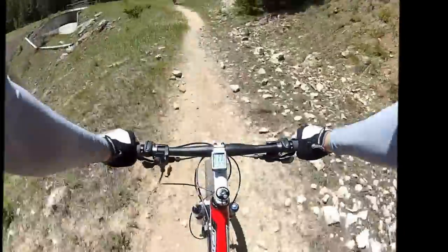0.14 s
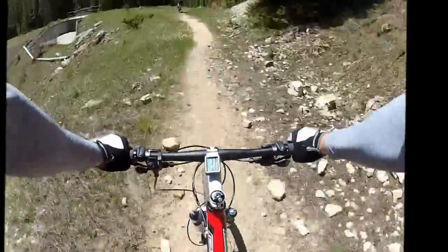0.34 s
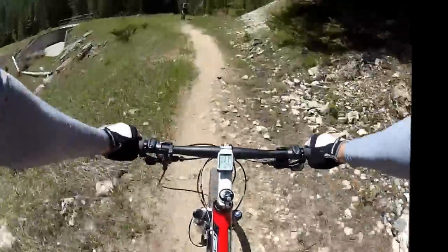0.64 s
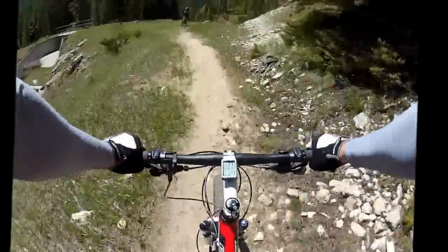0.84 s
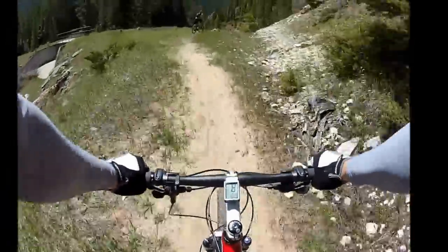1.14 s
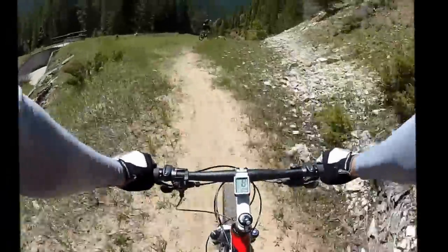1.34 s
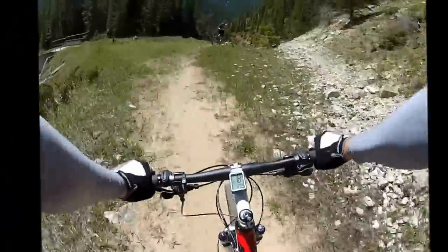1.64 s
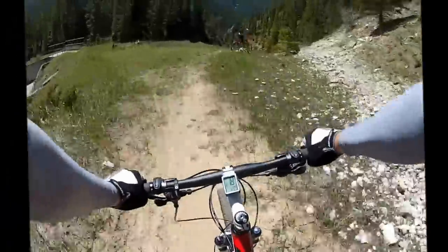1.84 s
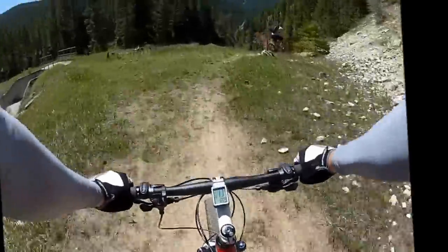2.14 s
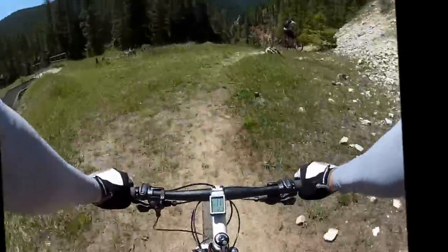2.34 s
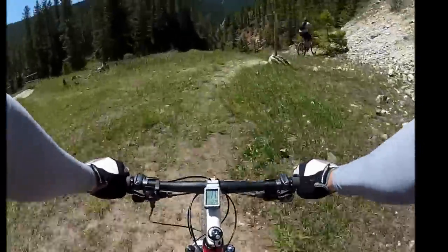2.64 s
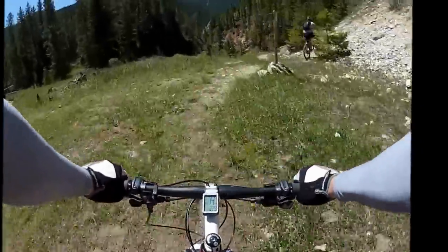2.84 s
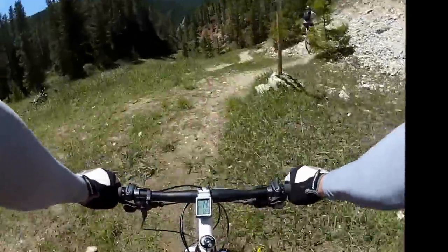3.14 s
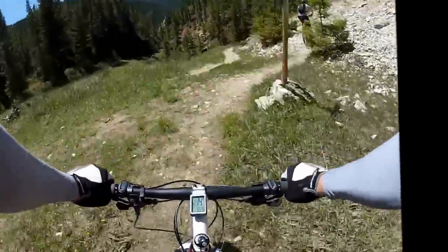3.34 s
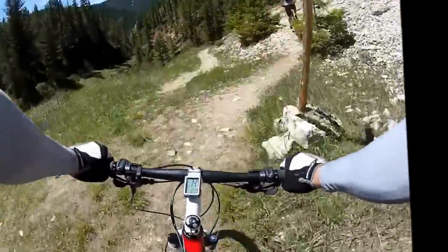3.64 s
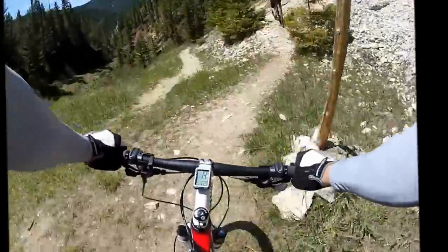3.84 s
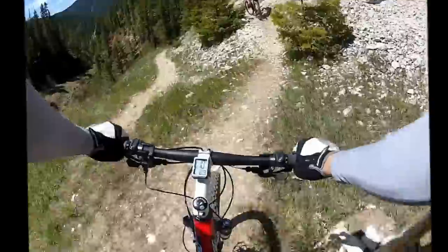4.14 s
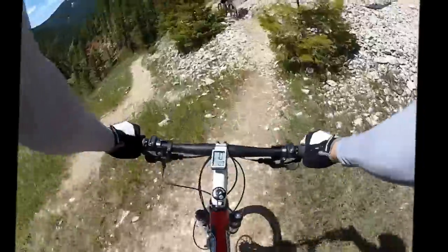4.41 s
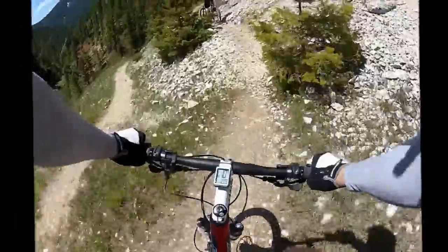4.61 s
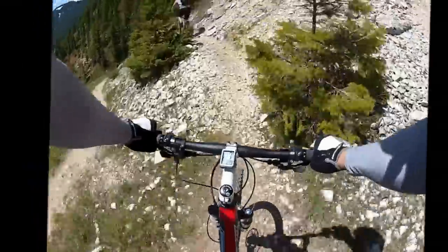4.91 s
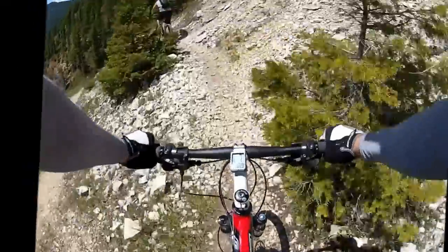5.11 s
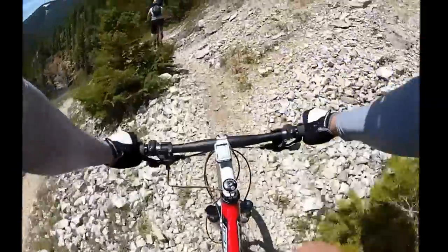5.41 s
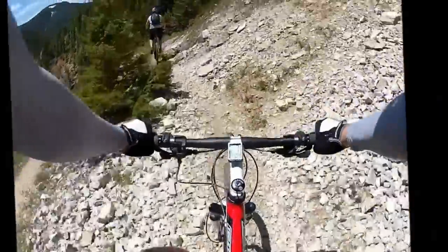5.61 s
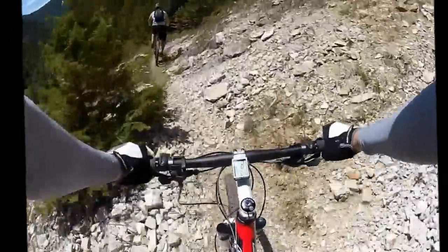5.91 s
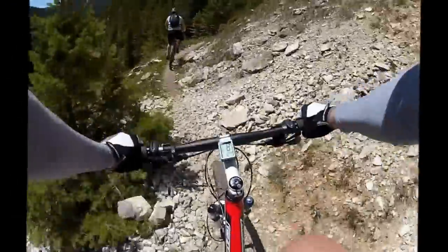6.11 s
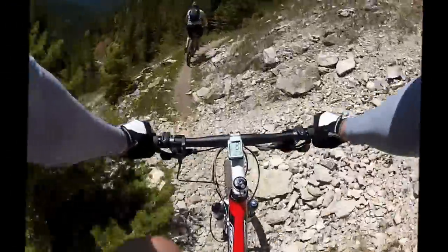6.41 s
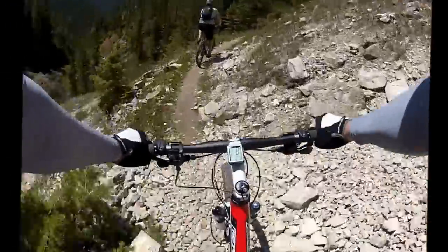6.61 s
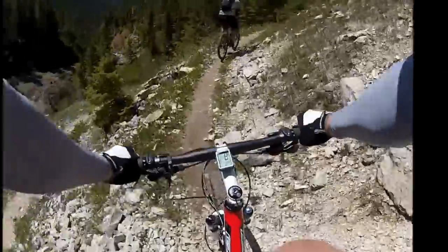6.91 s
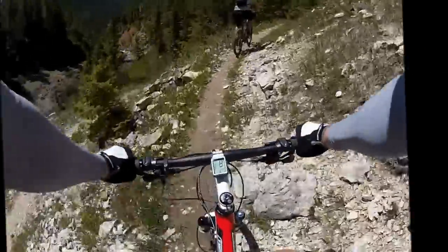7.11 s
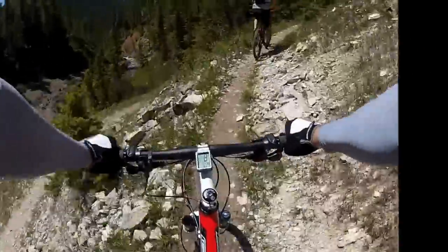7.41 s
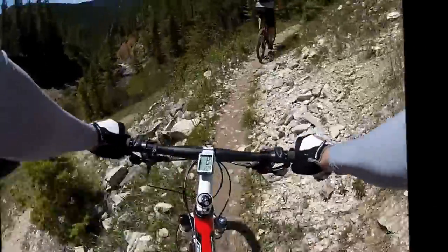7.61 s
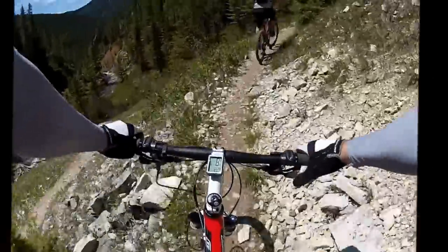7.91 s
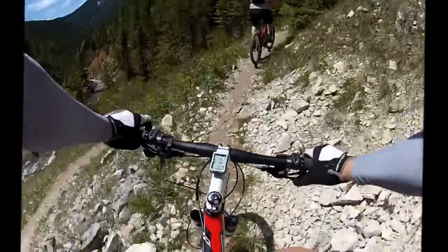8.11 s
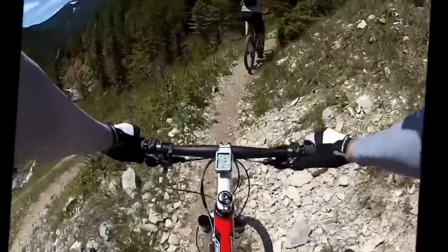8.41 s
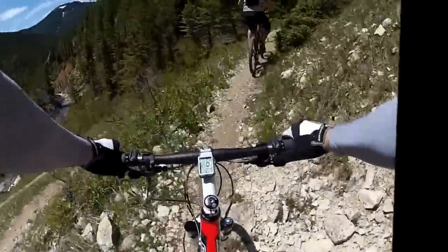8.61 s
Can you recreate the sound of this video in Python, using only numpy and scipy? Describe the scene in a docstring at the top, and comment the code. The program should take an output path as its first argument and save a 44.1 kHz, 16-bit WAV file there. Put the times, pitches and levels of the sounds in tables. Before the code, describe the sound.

Low gusty wind roar dominates a downhill bike ride, over gritty tyre crunch, dull frame knocks, sharp pebble clicks and short plasticky rattles.

```python
"""Wind buffeting a housing is heard first, over tyres that crunch gravel: a mountain bike runs down a trail of
dirt, grass and loose stones, heard from a camera worn on the rider's chest. Wind and dust are shaped noise;
crunch, rattle and the rasp of the shaken mount are tiny impacts through resonances; bumps and stones are struck
modes. The recorder holds each sample, which mirrors the sound into a thin treble fizz."""
import sys
import numpy as np
from scipy import signal
from scipy.fft import rfft, irfft
from scipy.io import wavfile
from scipy.ndimage import uniform_filter1d

SR = 44100
rng = np.random.default_rng(int(sys.argv[2]) if len(sys.argv) > 2 else 0)


def master(y):
    """Save y as 16-bit WAV."""
    cut = np.clip(np.atleast_2d(y).T, -1, 1)
    pcm = np.round(cut * 32767)  # scale
    wavfile.write(sys.argv[1], SR, pcm.astype(np.int16))


N = 385963  # samples


def undb(db):
    """Logarithmic level: decibels to amplitude gain."""
    return 10 ** (np.asarray(db) / 20)


def unit(x):
    """Normalisation: scale to rms 1."""
    return x / np.sqrt(np.mean(x ** 2))


def curves(table):
    """Linear interpolation: the columns of a table, one value a sample."""
    s, *columns = np.transpose(table)
    return [np.interp(np.arange(N) / SR, s, column) for column in columns]


def colour(x, points):
    """Spectral shaping: weight x by (Hz, dB) points joined over log frequency, at rms 1."""
    hz, db = np.transpose(points)
    f = np.maximum(np.fft.rfftfreq(N, 1 / SR), 1)
    gain = undb(np.interp(np.log(f), np.log(hz), db))
    return unit(irfft(rfft(x) * gain, N))


def resonate(x, modes):
    """Parallel resonance: (Hz, width Hz of one pass, dB), each passed forwards and backwards, at rms 1."""
    total = 0
    for hz, width, db in modes:
        peak = signal.iirpeak(hz, hz / width, fs=SR)
        total = total + undb(db) * signal.filtfilt(*peak, x)
    return unit(total)


def walk(rate_hz):
    """Low-passed noise: a smooth random wander of rms 1, mostly slower than rate_hz."""
    f = np.fft.rfftfreq(N, 1 / SR)
    return unit(irfft(rfft(rng.standard_normal(N)) * np.exp(-(f / rate_hz) ** 2), N))


def grains(rate, spread_db):
    """Shot noise: about rate impulses a second, sizes spread exponentially in dB, at rms 1."""
    chance, sign = rng.random(N), rng.choice([-1, 1], N)
    size = undb(spread_db * np.minimum(rng.exponential(size=N), 3))
    return unit((chance < rate / SR) * sign * size)


def ring(t, hz, t60, contact_s=0.00047):
    """Damped oscillation: a struck mode builds up during contact and decays, slightly detuned at every blow."""
    detuned_hz = hz * (1 + 0.033 * rng.standard_normal())
    swing = np.sin(2 * np.pi * (detuned_hz * t + rng.random()))
    onset = 1 - np.exp(-(t / contact_s) ** 2)
    return swing * onset * np.exp(-np.log(1000) * t / t60)


def add(out, s, sound):
    """Superposition: mix a sound in at time s."""
    i = max(int(s * SR), 0)
    out[i:i + len(sound)] += sound[:max(N - i, 0)]


def stream(points):
    """Turbulence: pressure noise that churns fast, while its power over a tenth of a second is steady."""
    air = colour(rng.standard_normal(N), points)
    return air / np.sqrt(uniform_filter1d(air ** 2, size=4400))


# strength of the air stream on the housing: start_s [s], level_db [dB, before gusts and layer gains]
WIND_STRENGTH = [(0.0, -10), (0.22, -15), (0.56, -9.5), (0.92, -15.5), (1.0, -11.5), (1.83, -14.5),
                 (2.22, -9), (3.0, -9), (3.24, -27.5), (3.38, -11), (4.02, -16), (4.19, -25), (4.43, -27),
                 (4.48, -31), (4.53, -19), (4.77, -22), (5.17, -19.5), (5.36, -35.5), (5.48, -23),
                 (5.95, -25.5), (6.26, -19), (6.31, -27), (6.38, -13.5), (6.58, -17.5), (6.68, -8.5),
                 (6.77, -19), (6.85, -12.5), (6.97, -19), (7.14, -6.5), (7.29, -15), (7.99, -10),
                 (8.07, -19.5), (8.51, -26), (8.75, -22.5)]
# slow, large eddies: frequency_hz [Hz], level_db [dB per Hz, relative]
RUMBLE_SPECTRUM = [(15, -11), (30, -5.5), (65, 3), (120, 4), (200, -2), (400, -17.5), (800, -46),
                   (3000, -100)]
# mid-sized eddies that buffet: frequency_hz [Hz], level_db [dB per Hz, relative]
BUFFET_SPECTRUM = [(15, -35), (30, -31), (65, -14.5), (140, -1.5), (220, -1), (300, -2), (450, -7),
                   (580, -10.5), (720, -20), (900, -33.5), (1300, -61.5), (4500, -83)]
# small eddies: frequency_hz [Hz], level_db [dB per Hz, relative]
EDDY_SPECTRUM = [(200, -0.5), (550, -3.5), (900, -9.5), (1300, -14.5), (1900, -17.5), (3000, -27),
                 (4200, -35.5), (5800, -58.5)]
GUST_DB, GUST_RATE_HZ = 1.11, 6.4  # quick random gusts on top of the strength


def wind(wind_db, strong_db=-10, rumble_db=-6.0, rumble_growth=0.73, buffet_db=-1.0, buffet_growth=1.136,
         flutter_db=1.5, eddy_db=-22, eddy_growth=2.2, eddy_flutter_db=1.5):
    """Flow noise: a slow stream mostly rumbles; a faster one sheds smaller eddies, so it grows brighter."""
    excess_db, churn = wind_db - strong_db, walk(41)
    rumble = stream(RUMBLE_SPECTRUM) * undb(rumble_db + rumble_growth * excess_db)
    buffet = stream(BUFFET_SPECTRUM) * undb(buffet_db + buffet_growth * excess_db + flutter_db * churn)
    eddies = stream(EDDY_SPECTRUM) * undb(eddy_db + eddy_growth * excess_db + eddy_flutter_db * churn)
    return (rumble + buffet + eddies) * undb(strong_db)


def jiggle(level_db=-53.0, ring_hz=1180, width_hz=200, low_hz=960, low_db=-4, shake_db=5, shake_rate_hz=12):
    """Resonance: random taps excite two modes of the housing, a faint, hollow, continual rattle."""
    taps = grains(rate=400, spread_db=1.0) * undb(shake_db * np.tanh(walk(shake_rate_hz)))
    return resonate(taps, [(ring_hz, width_hz, 0), (low_hz, width_hz, low_db)]) * undb(level_db)


# gravel under the tyres: start_s [s], level_db [dB, before the crunch and dust gains]
GRAVEL_LEVEL = [(0.0, -42), (0.61, -38.5), (0.78, -43), (1.41, -42), (1.73, -47.5), (2.46, -46.5),
                (3.19, -51), (3.43, -48.5), (5.21, -49.5), (6.43, -48), (7.24, -46.5), (7.43, -50),
                (8.33, -50.5), (8.75, -49.5)]
# colour of crunch and dust: frequency_hz [Hz], level_db [dB per Hz, relative]
GRAVEL_SPECTRUM = [(300, -44), (900, 0.5), (1500, -9), (2000, -3), (2400, -4.5), (2800, 2.5), (3150, -3),
                   (3600, -5.5), (4200, -11), (4700, -12), (5300, -19.5), (6000, -18)]


def gravel(gravel_db, crunch_db=1.0, dust_db=-2, patchy_db=3.0, ring_width_hz=520, size_db=0.7):
    """Granular impact: tyre knobs crush pebbles in clusters, each size at its own pitch, over hissing fine dirt."""
    cluster = undb(patchy_db * 2 * np.tanh(walk(40) / 2))
    ticking = 0
    for hz in np.linspace(1000, 5400, 9):  # one pitch per pebble size
        ticks = grains(rate=120, spread_db=size_db)
        ticking = ticking + signal.lfilter(*signal.iirpeak(hz, hz / ring_width_hz, fs=SR), ticks)
    dust = colour(rng.standard_normal(N) * np.sqrt(cluster), GRAVEL_SPECTRUM)
    crunch = colour(ticking * cluster, GRAVEL_SPECTRUM)
    return (undb(crunch_db) * crunch + undb(dust_db) * dust) * undb(gravel_db)


GRASS_FROM_S, GRASS_TO_S = 1.6, 3.6  # a smooth stretch without random pebbles or light jolts


def stony_moments(rate, uneven, count=120):
    """Random point process: uneven moments on stony ground, rows (s, gravel dB, two numbers of spread 1)."""
    chance = rng.standard_normal((count, 3))
    gaps = np.exp(uneven * chance[:, 0] - uneven ** 2 / 2)  # mean 1
    s = np.cumsum(gaps) / rate
    stony = (s < GRASS_FROM_S) | ((s > GRASS_TO_S) & (s < N / SR))
    gravel_db = np.interp(s, *np.transpose(GRAVEL_LEVEL))
    return np.column_stack([s, gravel_db, chance[:, 1:]])[stony]


# lighter jolts: mean rate, typical length, level relative to the gravel table
SHAKES_PER_S, SHAKE_S, SHAKE_DB = 5, 0.032, -3


def shakes(scatter_db=1.0, length_scatter=0.28):
    """Random excitation: light jolts, stronger where the gravel is louder, rows (s, length s, level dB)."""
    return [(s, SHAKE_S * np.exp(length_scatter * length), gravel_db + SHAKE_DB + scatter_db * size)
            for s, gravel_db, size, length in stony_moments(SHAKES_PER_S, uneven=.45)]


# hardest jolts of the camera mount: start_s [s], length_s [s], level_db [dB, before the slip gain]
HARD_JOLTS = [(0.167, 0.057, -44), (0.38, 0.035, -41.5), (1.195, 0.015, -41.5), (1.48, 0.07, -45),
              (2.258, 0.023, -47.5), (2.814, 0.069, -45), (3.662, 0.047, -51), (3.762, 0.054, -49),
              (3.982, 0.032, -46.5), (4.162, 0.054, -39.5), (4.987, 0.047, -44), (5.196, 0.052, -47),
              (6.188, 0.11, -46), (6.321, 0.031, -44.5), (6.663, 0.015, -39), (7.215, 0.074, -49),
              (7.349, 0.034, -48.5), (7.649, 0.021, -47.5), (7.78, 0.078, -49), (8.68, 0.061, -49)]
# resonances of housing and mount: frequency_hz [Hz], width_hz [Hz, one filter pass], level_db [dB, relative]
HOUSING_MODES = [(1134, 155, 5.5), (1750, 920, -3), (2550, 160, -2), (2940, 230, -3), (3430, 200, 2.5),
                 (3880, 145, 5.5), (5340, 2400, -13.5)]


def rasp(slip_db=6.0, jerk_db=3, edge=3.7):
    """Stick-slip friction: at each jolt the mount slides in a run of tiny slips that ring the housing."""
    t = np.arange(N) / SR
    sliding = 0
    for s, length, db in HARD_JOLTS + shakes():
        place = 2 * (t - s) / length - 1  # -1 at the start, 1 at the end
        sliding = sliding + undb(db) / (1 + np.abs(place) ** (2 * edge))
    slips = grains(rate=1500, spread_db=-4.5) * undb(jerk_db * np.tanh(walk(110)))
    return resonate(slips, HOUSING_MODES) * sliding * undb(slip_db)


# bumps that knock the frame: start_s [s], level_db [dB, before the knock gain and modes]
FRAME_BUMPS = [(0.542, -21.5), (0.5998, -22), (2.1503, -21), (2.173, -22.5), (2.416, -19), (3.3422, -24),
               (4.163, -27), (4.2503, -33), (4.277, -27), (4.428, -32), (6.6628, -22.5), (6.796, -26),
               (7.5175, -25), (7.885, -27)]
# modes of a knock: frequency_hz [Hz, before detuning], t60_s [s], level_db [dB, relative]
KNOCK_MODES = [(290, 0.016, 15.5), (560, 0.024, -2), (964, 0.025, 4.5), (1176, 0.039, 1),
               (1474, 0.0089, 9.5), (1920, 0.022, -1.5)]


def bumps(knock_db=3, contact_s=0.0012):
    """Modal impact: a wheel meets a rock or rut and the bike gives a dull knock, softened by the tyre."""
    out, t = np.zeros(N), np.arange(SR // 10) / SR
    for s, db in FRAME_BUMPS:
        knock = sum(undb(mode_db) * ring(t, hz, t60, contact_s) for hz, t60, mode_db in KNOCK_MODES)
        add(out, s, undb(db + knock_db) * knock / 2)
    return out


# pebbles flung up by the tyres: mean rate, level relative to the gravel table, typical ring pitch
PEBBLES_PER_S, PEBBLE_DB, PEBBLE_HZ = 8.7, 14.5, 2920


def pebbles(scatter_db=4.0, pitch_scatter=0.074):
    """Random impact: pebbles hit harder where the gravel is louder, rows (s, level dB, ring Hz)."""
    return [(s, gravel_db + PEBBLE_DB + scatter_db * size, PEBBLE_HZ * np.exp(pitch_scatter * pitch))
            for s, gravel_db, size, pitch in stony_moments(PEBBLES_PER_S, uneven=0.98)]


# biggest stones that strike the bike: start_s [s], level_db [dB, before the strike gain],
# pitch_hz [Hz, before mode ratio and detuning]
BIG_STONES = [(0.187, -24.5, 2790), (0.5425, -8.5, 2980), (0.599, -11, 2420), (0.628, -13.5, 2960),
              (0.6644, -20, 3020), (0.7861, -16, 2790), (1.3264, -20, 2820), (1.3658, -21.5, 3150),
              (5.5694, -20, 3250), (5.6358, -26.5, 2760), (5.734, -21, 2760), (6.3859, -21, 3380),
              (6.597, -20.5, 4040), (6.764, -24, 2820), (7.0254, -20.5, 2720), (8.2342, -14, 2520)]
# modes of a strike: pitch_ratio [multiple of the ring pitch], t60_s [s], level_db [dB, relative]
STRIKE_MODES = [(.82, 0.016, -16), (.91, .007, -35), (1, 0.0058, 10), (1.12, 0.0034, -3.5),
                (1.36, 0.0074, -13.5), (1.9, 0.012, -14)]
# sharp crack of a stone: frequency_hz [Hz], level_db [dB per Hz, relative]
CRACK_SPECTRUM = [(900, -40), (1800, -11), (2800, 14), (4000, 4), (5000, -0.5), (6500, -16)]


def stones(strike_db=1, chatter_db=-19, chatter_s=0.0083, graze_s=0.0042, crack_db=-12, crack_s=0.0033,
           lag_s=.0003):
    """Impact and friction: each stone grazes the bike, cracks with a dead click, and chatters as it skids off."""
    out, t = np.zeros(N), np.arange(SR // 20) / SR
    around = t - t.mean()  # time from the moment of contact
    cracks = colour(rng.standard_normal(N), CRACK_SPECTRUM)
    for k, (s, db, hz) in enumerate(BIG_STONES + pebbles()):
        click = sum(undb(mode_db) * ring(t, hz * ratio, t60) for ratio, t60, mode_db in STRIKE_MODES)
        click = click / np.abs(click).max()
        rough = cracks[k * len(t):(k + 1) * len(t)]
        rubbing = signal.fftconvolve(rng.standard_normal(len(t)), click)[:len(t)]
        skid = unit(unit(rubbing) + rough / 2)
        skid = skid * np.exp(-np.maximum(around / chatter_s, -around / graze_s))
        strike = click + undb(crack_db) * rough * np.exp(-t / crack_s)
        add(out, s + lag_s, undb(db + strike_db) * strike)
        add(out, s + lag_s - t.mean(), undb(db + strike_db + chatter_db) * skid)
    return out


def scene():
    """Superposition in open air: wind, tyres and rattles add at one microphone."""
    wind_db = curves(WIND_STRENGTH)[0] + GUST_DB * walk(GUST_RATE_HZ)
    gravel_db, = curves(GRAVEL_LEVEL)
    return (wind(wind_db) + gravel(gravel_db) + rasp() + jiggle() + bumps() + stones())[None]


HOLD_HZ, TOP_HZ = 12000, 15150  # rate of the held samples, upper limit of the treble


def record(dry):
    """Sample-and-hold imaging: peaks are rounded, then held slow samples mirror the sound into the treble."""
    rounded = dry / (1 + dry ** 8) ** (1 / 8)
    # the gentle filter also lets some treble fold down
    slow = signal.resample_poly(rounded, HOLD_HZ, SR, axis=1, window=("kaiser", 3))
    stairs = np.repeat(slow, 4, axis=1)
    held = signal.resample_poly(stairs, SR, 4 * HOLD_HZ, axis=1)[:, :N]
    return signal.sosfilt(signal.ellip(8, .2, 70, TOP_HZ, fs=SR, output="sos"), held)


dry = scene()
out = record(dry)
master(out)
```